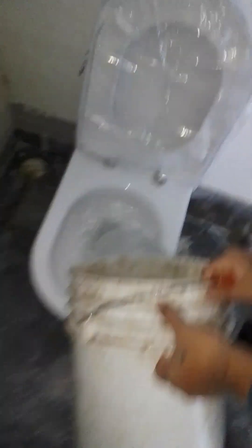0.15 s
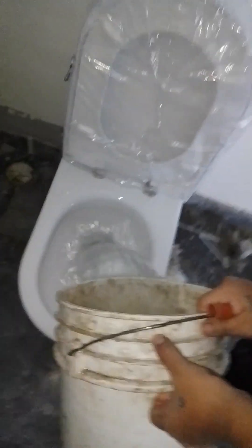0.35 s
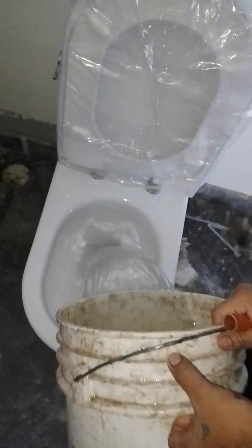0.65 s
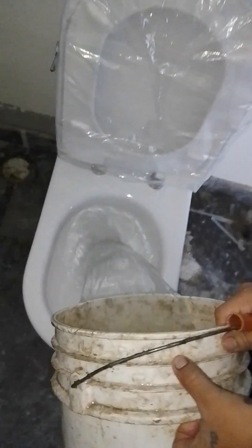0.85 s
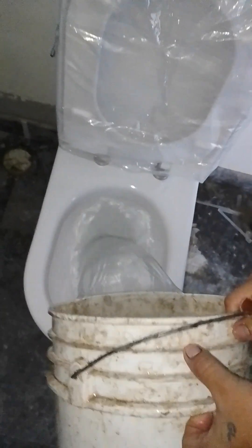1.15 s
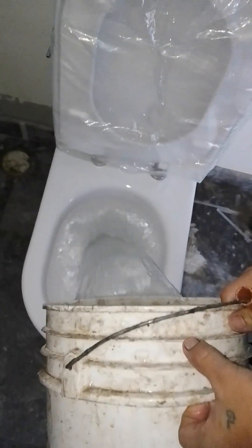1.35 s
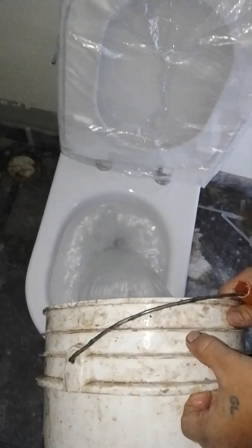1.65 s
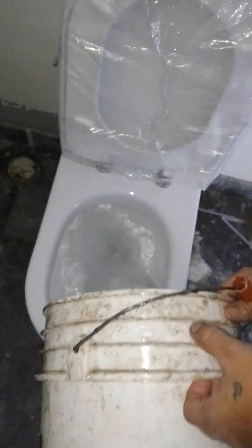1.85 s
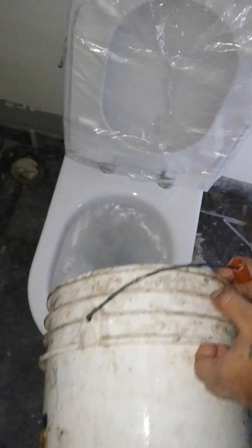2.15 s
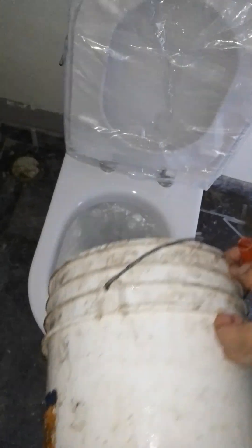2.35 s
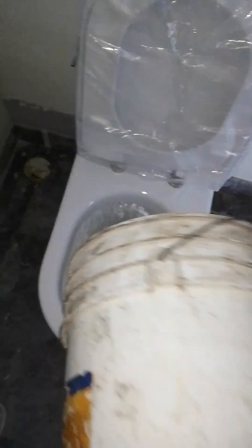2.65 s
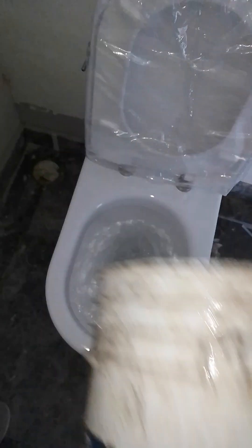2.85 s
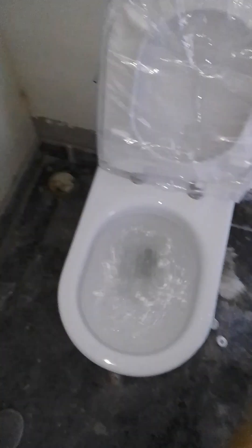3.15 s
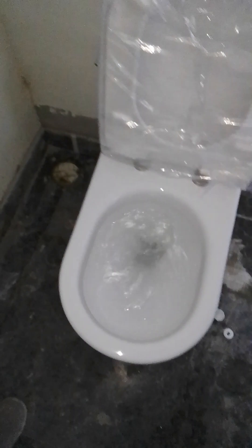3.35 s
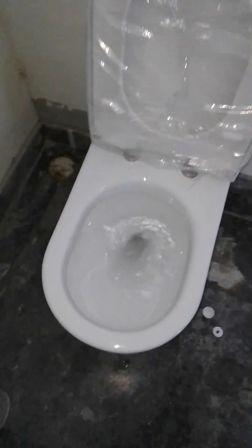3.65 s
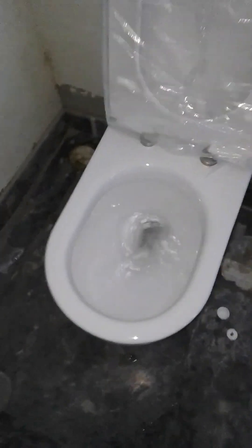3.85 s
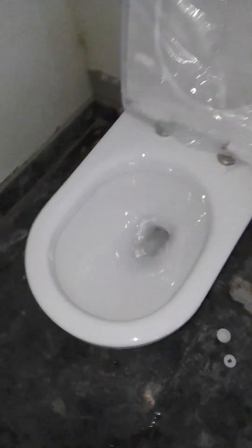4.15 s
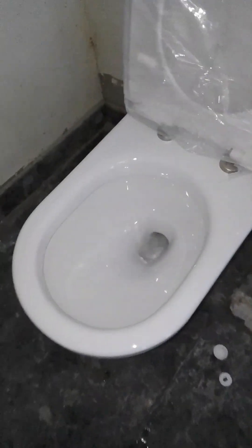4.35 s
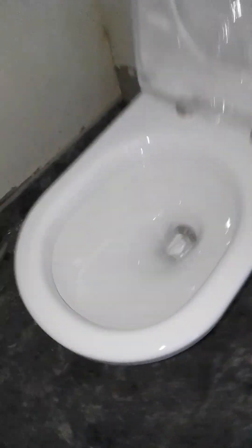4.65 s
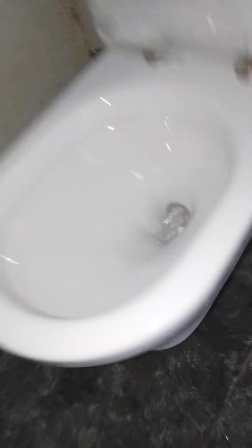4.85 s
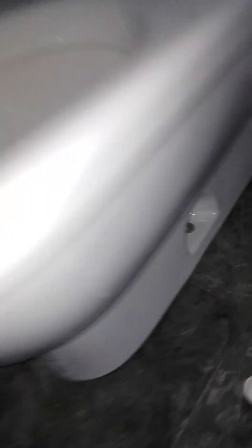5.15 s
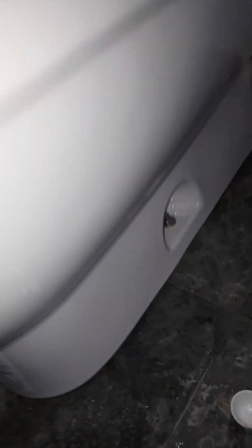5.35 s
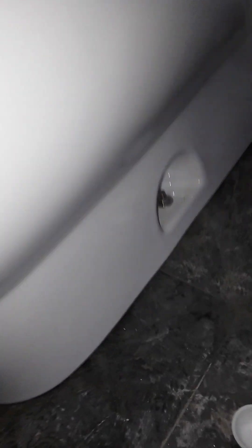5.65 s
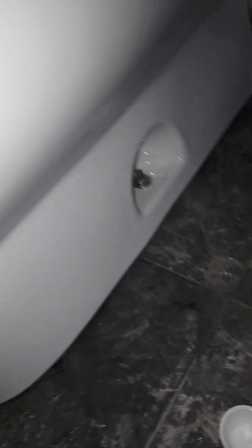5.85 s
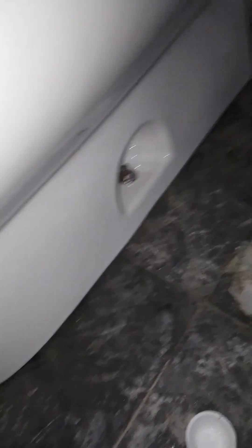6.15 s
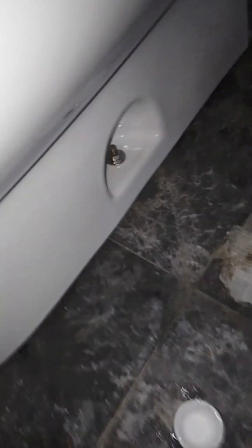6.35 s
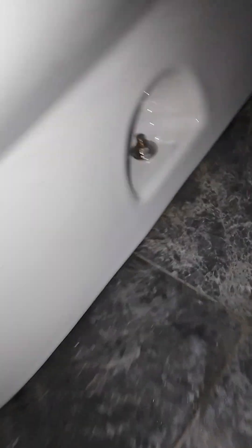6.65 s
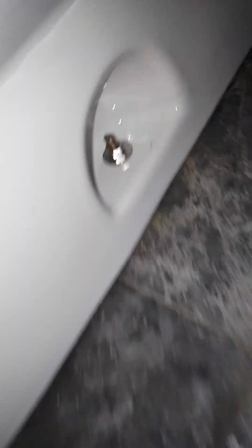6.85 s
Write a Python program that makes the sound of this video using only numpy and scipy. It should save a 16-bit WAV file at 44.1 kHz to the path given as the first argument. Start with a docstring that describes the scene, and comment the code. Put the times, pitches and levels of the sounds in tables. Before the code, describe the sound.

Water pours hard from a bucket into a toilet bowl, thins out, glugs loudly down the trap, then the plastic bucket knocks down and wet shoes shuffle.

```python
"""Bucket emptied into a toilet

A pour into a ceramic bowl in a small tiled room thins out; water swirls and the trap glugs.
Water is noise from tiny impacts plus gliding bubble tones. The plastic bucket bumps and is set down
hard: juddering contacts excite its air and wall modes. Shoes scuff, squelch and creak on the wet
floor while the drain gurgles softly, over a faint hush."""
import sys
import numpy as np
from scipy import signal
from scipy.fft import rfft, irfft
from scipy.io import wavfile
from scipy.ndimage import uniform_filter1d

SR = 44100
rng = np.random.default_rng(int(sys.argv[2]) if len(sys.argv) > 2 else 0)


def materialize(psi):
    """Save the field psi as 16-bit PCM at rate SR to the path in sys.argv[1].

    A 1-D psi becomes a single channel; in a 2-D psi each row is a channel.
    """
    bounded = np.clip(np.atleast_2d(psi).T, -1, 1)
    quanta = np.round(bounded * 32767).astype(np.int16)
    wavfile.write(sys.argv[1], SR, quanta)


N = 308259
TIME = np.arange(N) / SR  # s

# Table levels are relative, ahead of filters, room and layer gains.
# pour spectrum: f/Hz, level/dB
POUR_COLOUR = [(150, -33), (300, -57), (440, -19), (620, -2.5), (800, -2.5), (1200, -2.5), (2600, -4),
               (5500, -5.5), (8600, -7), (10200, -1), (12500, -9.5), (16000, -16.5)]
POUR_RISE_S, THINS_S, BREAKS_S, DIES_DB_PER_S = 0.0003, 0.52, 1.143, 147.5
# pour layers: level/dB, sag/(dB/s); a thinner stream loses its depth first
BODY = (-45, 30.5)
CHURN = (-41, 12.6)
SPRAY = (-42.5, 5.5)

# single splashes, each a cluster of like bubbles: t/s, f/Hz, level/dB
SPLASHES = [(0.088, 458, -34), (0.124, 514, -34), (0.476, 2580, -34), (.555, 1890, -38),
            (0.586, 10300, -36), (0.727, 10200, -37), (0.901, 2280, -35), (1.009, 5500, -35),
            (1.081, 1283, -34), (1.095, 7340, -38), (1.132, 7860, -42.5), (1.596, 622, -42.5),
            (2.865, 2380, -37.5), (3.014, 2550, -39.5)]
DROPS_PER_S, DROP_DB, DROP_LOW_HZ, DROP_HIGH_HZ = 14, -47.5, 2920, 10900  # stray drops of the pour

# swirling water spectrum: f/Hz, level/dB
SWIRL_COLOUR = [(200, -32.5), (400, -18.5), (800, -4), (1500, 0), (3000, -3.5), (4500, -2), (6500, 3),
                (10500, 8), (15500, -1.5)]
# water running round and off the bowl: t/s, churn level/dB, spray level/dB
RUNOFF = [(1.3, -63.5, -68), (1.7, -59.5, -84), (2.0, -44.5, -52.5), (2.25, -49, -56.5), (2.45, -65, -45.5),
          (2.8, -34, -44.5), (2.95, -50.5, -45), (3.22, -48.5, -59), (3.52, -55.5, -56.5), (3.63, -54, -48),
          (3.87, -60.5, -49.5), (4.05, -61, -60.5), (4.5, -55, -55.5), (5.04, -68.5, -60), (5.14, -68, -90)]
# surges of water noise (pour surges, sloshes in the bowl, one bucket rasp at 1.88 s):
# crest t/s, churn level/dB, spray level/dB
SURGES = [(.14, -38, -31), (.57, -40, -41), (.745, -76, -35), (1.635, -74, -56), (1.791, -59, -38),
          (1.881, -31, -40.5), (2.14, -38.5, -44), (2.477, -32.5, -27.5), (2.595, -37.5, -34.5),
          (3.315, -33, -35.5), (5.051, -62, -55.5)]
SURGE_RISE_S, SURGE_FALL_S = 0.04, 0.029

# big air pockets gulped through the trap: t/s, level/dB, f/Hz
GULPS = [(2.389, -14.5, 330), (2.472, -10.5, 348), (2.523, -3.5, 329), (2.604, -23, 323),
         (2.638, -6.5, 340), (2.7, -10, 302), (2.729, -9, 295), (2.814, -10.5, 312), (2.891, -17, 404),
         (3.137, -5.5, 236), (3.141, -23, 106), (3.156, -12.5, 424), (3.191, -24.5, 490), (3.56, -36, 285)]
GULP_CYCLES, GULP_ONSET_CYCLES, GULP_LOW_HZ = 1.82, 1.58, 200
GULP_GLIDE = -0.062  # the pitch sinks as the pocket swells
# water slapping shut over the trap: t/s, slap level/dB, bubble level/dB, bubble f/Hz, ring/cycles
SLAPS = [(2.303, -19, -12, 1100, 2.8), (2.387, -19, -12, 790, 2), (2.393, -44, -17, 920, 7.6),
         (2.409, -19, -25, 907, 13), (2.479, -21, -14.5, 866, 5), (2.525, -45, -16.5, 626, 5.8),
         (2.582, -18.5, -11.5, 850, 8.6), (2.607, -38, -12, 745, 1.7), (2.615, -26, -2.5, 740, 1.8),
         (2.643, -31, -20, 760, 5.6), (2.741, -25, -12, 686, 3.8), (2.756, -34, -20, 914, 2.3),
         (2.778, -47, -13.5, 830, 4.9), (2.815, -38, -16, 735, 3.8), (3.135, -36, -17.5, 399, 4.6),
         (3.215, -41, -35, 890, 28), (3.285, -32, -22.5, 1300, 5)]
# slap spectrum: f/Hz, level/dB
SLAP_COLOUR = [(150, -56.5), (280, 7.5), (520, -6.5), (900, 12.5), (1200, 4.5), (1700, 2.5), (2750, -4.5),
               (3200, -18), (6000, -27), (10500, -14.5), (16000, -27.5)]
SLAP_DECAY_S, SLAP_SPATTER_DB = 0.011, -0.5
PLOP_GLIDE, PLOP_ONSET_CYCLES = 0.024, 0.62
# deep churning spectrum: f/Hz, level/dB
PLUNGE_COLOUR = [(50, -54.5), (100, -23.5), (165, -38.5), (215, -4.5), (280, -3), (330, 7.5), (420, 1.5),
                 (650, 4), (880, -12), (1300, -26), (4000, -51)]
BOIL_START_S, BOIL_FULL_S, BOIL_END_S, BOIL_RELEASE_S = 2.17, 2.44, 2.92, 0.079
BOIL_DB, BOIL_SAG_DB_PER_S = -37, 12
BLIPS_PER_S, BLIP_DB, BLIP_LOW_HZ, BLIP_HIGH_HZ = 70, -10, 328, 1394  # single bubbles in the churn

# bucket contact spectrum: f/Hz, level/dB
BUCKET_COLOUR = [(60, -40.5), (160, -16.5), (210, -8), (420, 1.5), (520, -8.5), (700, -8), (860, 1),
                 (1040, -3.5), (1400, -2), (1800, -6.5), (2250, -5.5), (3000, -17.5), (6000, -28),
                 (10500, -18.5), (16000, -32)]
# bucket knocks: t/s, level/dB, length/s, rasp/dB, hollow ring/dB
KNOCKS = [(1.376, -35.5, 0.03, -12, -12), (1.608, -46.5, .04, 4, -16), (1.864, -25, .03, -7, -3),
          (2.305, -35, 0.037, -1, -2.5), (4.2212, -9, .0065, -2.5, -13), (4.237, -22.5, 0.0097, 0, -6),
          (4.28, -20.5, 0.025, 6.5, -17), (4.375, -20.5, 0.013, 13.5, -12.5), (4.51, -34.5, 0.0026, -5, -9)]
KNOCK_RISE_SHARE, KNOCK_BOOM_DB, BUCKET_RELEASE_S = 0.15, -2, 0.0068  # a shorter knock starts harder
# bucket drags: t/s, level/dB, length/s
SCRAPES = [(1.845, -35, 0.036), (4.032, -34.5, 0.077)]
SCRAPE_RISE_SHARE, SCRAPE_BOOM_DB, SCRAPE_RASP_DB, SCRAPE_HOLLOW_DB = 0.55, -10, -14, -7
# wet base hissing over grit as it rocks: t/s, level/dB, length/s
SKIDS = [(4.243, -37.5, 0.084), (4.267, -30, 0.02), (4.387, -26, 0.011), (4.425, -28.5, 0.016)]
# skid spectrum: f/Hz, level/dB
SKID_COLOUR = [(1500, -31), (3500, -4.5), (7000, -12.5), (10500, 3.5), (13500, -3.5), (16000, -9)]
SKID_RISE_SHARE = 0.32
# air column in the bucket: f/Hz, level/dB, t60/s
AIR_MODES = [(434.4, 10, 0.11), (947, 12, 0.048), (1310, 13.5, 0.066), (1655, 6, .06), (2100, 4, .04),
             (2720, 7, .05)]
# bucket wall: f/Hz, level/dB, t60/s
BUCKET_MODES = [(210, -27.5, .8), (308, -24, 1.05), (385, -24, 1.1), (441, -19.5, .9), (791, -23, .85),
                (862, -20, .8), (912, -19, .75), (1158, -23, .6), (1297, -23, .55), (1401, -22, .65),
                (1464, -21.5, .65), (1680, -21, .5), (2083, -26, .28), (2270, -24, .33)]
TWIN_SPLIT, TWIN_GAIN = 0.016, 0.5  # not quite round: each mode beats with a detuned twin
WALL_RING_DB, HAND_DAMPING_DB, LANDS_S = 0.5, -7.5, 4.2  # in the hand, the wall rings weaker

# footstep spectrum: f/Hz, level/dB
STEP_COLOUR = [(60, -27), (110, -4), (165, -5.5), (300, 2.5), (480, 5), (750, -4), (1100, -9.5),
               (1500, -9.5), (2450, -11), (3000, -8), (4200, -3.5), (6500, -9), (10500, -0.5),
               (16000, -13.5)]
# footfalls: t/s, slap level/dB, length/s, grit level/dB
FOOTFALLS = [(5.355, -48, 0.0014, -48), (5.775, -37, 0.004, -51), (5.799, -38.5, 0.023, -42.5),
             (5.995, -37.5, 0.0057, -43), (6.068, -28, 0.006, -36.5), (6.133, -30, 0.0078, -48),
             (6.236, -41, 0.0023, -47), (6.26, -19.5, 0.0037, -33), (6.363, -47, 0.0012, -41),
             (6.662, -46, 0.0062, -74)]
FOOT_RISE_S, FOOT_THUD_DB = 0.00068, -30  # all carry the same weight
# soles sliding: t/s, level/dB, length/s, thud/dB, grit level/dB
SCUFFS = [(5.296, -54.5, 0.17, 11.5, -45), (5.462, -64, 0.11, 12.5, -44), (5.902, -42, 0.2, -19, -45),
          (6.086, -41.5, 0.058, 4, -52), (6.263, -51, 0.052, 14.5, -56), (6.367, -58, 0.079, -1, -44)]
SCUFF_RISE_SHARE = 0.42
# water squeezed from under a sole: t/s, f/Hz, level/dB
SQUELCHES = [(5.8, 457, -39), (6.015, 976, -45.5), (6.06, 334, -33), (6.065, 1930, -33), (6.125, 543, -45),
             (6.263, 1880, -33), (6.285, 936, -44)]
# hollow ring under a footfall: f/Hz, level/dB, t60/s
STEP_MODES = [(394, -7.5, 0.067), (915, 3, .1), (1874, 7, .07), (2170, 1, 0.041)]

# sharp ticks of drips and wet soles: t/s, level/dB
TICKS = [(1.476, -36.5), (4.082, -29.5), (4.585, -30.5), (4.73, -36), (4.905, -38), (4.976, -34),
         (5.176, -42.5), (6.584, -36.5), (6.931, -30.5)]
# creaking sole: t/s, length/s, level/dB ahead of the swell
CREAKS = [(6.493, 0.033, -38.5), (6.584, 0.024, -37.5), (6.707, 0.049, -34)]
CREAK_SWELL_DB = 8  # rise from start to end
# tick and creak spectrum: f/Hz, level/dB
TICK_COLOUR = [(1200, -22.0), (2500, -11.5), (3600, -3.5), (4200, -0.5), (6000, -5.0),
               (8500, 0.5), (11000, 7.0), (14000, -3.0), (16000, -2.5)]

# sleeve or trouser leg swishing: t/s, level/dB, centre f/Hz
SWISH = [(5.2, -71, 906), (5.3, -55, 1240), (5.38, -55.5, 2050), (5.52, -53, 3100), (5.62, -74, 3200)]
SWISH_WIDTH_HZ = 1800

# last water deep in the drain pipe
DRAIN_START_S, DRAIN_DB, DRAIN_HZ, DRAIN_SCATTER, DRAIN_PER_S = 5.35, -55, 283, 0.139, 16

# reverberation time: f/Hz, t60/s
ROOM_T60 = [(100, 1.4), (300, 1.08), (600, 0.81), (1200, 0.6), (2500, 0.36), (6000, 0.31), (14000, 0.16)]
# standing waves: f/Hz, level/dB, t60/s
ROOM_MODES = [(214.5, 1.5, 1.4), (283.5, -3, 0.92), (296.3, 2.5, 2.3), (332.6, -4.5, 3), (414, -6, 1.6),
              (451, -7.5, 0.22)]
# hush spectrum: f/Hz, level/dB
HUSH = [(25, -11.5), (100, -4.5), (160, -4.5), (290, 0.5), (520, -11.5), (1500, -17.5), (6000, -27),
        (10700, -14.5), (16000, -23)]
HUSH_DB = -60.5
EDGE_HZ = 16200


def pour():
    """The thick stream hits the bowl; water also surges and swirls: impact noise mixed with bubbles."""
    foam = froth(cycles=12, spread_db=3)
    stream = patter(rate_per_s=1000, spread_db=0.5, decay_s=0.0015) + amp(-4.0) * foam
    trickle = patter(rate_per_s=990, spread_db=4.5, decay_s=0.0015) + amp(-2.5) * foam
    churning = flow(*CHURN) * wavering(depth_db=1.5, rate_hz=26.7)
    spraying = flow(*SPRAY) * wavering(depth_db=4.0, rate_hz=35)
    return water(churning, spraying, POUR_COLOUR, stream) + water(*swirl(), SWIRL_COLOUR, trickle)


def flow(db, sag_db_per_s):
    """Gain of one layer of the pour: it starts, holds, thins and breaks off."""
    thinning_db = sag_db_per_s * np.maximum(TIME - THINS_S, 0)
    breaking_db = DIES_DB_PER_S * np.maximum(TIME - BREAKS_S, 0)
    return amp(db - thinning_db - breaking_db) * (1 - np.exp(-TIME / POUR_RISE_S))


def wavering(depth_db, rate_hz):
    """Gain wandering through random knots at the given rate."""
    knots = rng.standard_normal(1000)
    return amp(depth_db * np.interp(TIME * rate_hz, np.arange(len(knots)), knots))


def swirl(churn_db=-2, spray_db=-4):
    """Churn and spray gains: the run-off, with each surge swelling and falling on top."""
    churning, spraying = levels(RUNOFF)
    for s, low_db, high_db in SURGES:
        swell = np.exp(-np.maximum((s - TIME) / SURGE_RISE_S, (TIME - s) / SURGE_FALL_S))
        churning = np.hypot(churning, amp(low_db) * swell)
        spraying = np.hypot(spraying, amp(high_db) * swell)
    return amp(churn_db) * churning, amp(spray_db) * spraying


def water(churning, spraying, colour, drive, split_hz=3500):
    """Bubbles and drops sound in the bowl: low churn and high spray each follow their gain."""
    sound = tint(drive, colour)[:N]
    churn, spray = (unit(signal.sosfilt(signal.butter(3, split_hz, side, fs=SR, output="sos"), sound))
                    for side in ("low", "high"))
    return churning * churn + spraying * spray


def splashes():
    """Blobs of water smack down as bubble clusters; stray drops thicken until the stream breaks up."""
    out = np.zeros(N)
    drops = []
    for when, size in rng.random((round(DROPS_PER_S * BREAKS_S), 2)):
        hz = DROP_LOW_HZ * (DROP_HIGH_HZ / DROP_LOW_HZ) ** size
        drops.append((np.sqrt(when) * BREAKS_S, hz, DROP_DB))
    for s, hz, db in SPLASHES + drops:
        add(out, s, amp(db) * cluster(hz, scatter=0.255, linger_s=0.0088, cycles=3.5, count=24))
    return out


def glugs():
    """Air breaks through the boiling trap: big pockets boom, water slaps shut, smaller bubbles plop."""
    gulps = np.zeros(N)
    for s, db, hz in GULPS:
        add(gulps, s, amp(db) * bubble(hz, GULP_CYCLES, GULP_GLIDE, GULP_ONSET_CYCLES))
    out = plunge() + signal.lfilter(*signal.butter(2, GULP_LOW_HZ, "high", fs=SR), gulps)
    for s, slap_db, bubble_db, hz, cycles in SLAPS:
        add(out, s, amp(slap_db) * slap())
        add(out, s, amp(bubble_db) * bubble(hz, cycles, PLOP_GLIDE, PLOP_ONSET_CYCLES))
    return out


def plunge():
    """Deep churning in the trap: first under the stream, then boiling as the bowl drains."""
    swell = np.clip((TIME - BOIL_START_S) / (BOIL_FULL_S - BOIL_START_S), 0, 1) ** 0.97
    hold = amp(BOIL_DB - BOIL_SAG_DB_PER_S * np.maximum(TIME - BOIL_FULL_S, 0))
    release = np.exp(-np.maximum(TIME - BOIL_END_S, 0) / BOIL_RELEASE_S)
    boil = swell * hold * release
    churn = tint(patter(rate_per_s=59, spread_db=-2.5, decay_s=0.0066), PLUNGE_COLOUR)[:N]
    return (flow(*BODY) + boil) * (churn + amp(BLIP_DB) * blips())


def blips():
    """Separate bubbles of uneven size, each a short rising tone."""
    out = np.zeros(N)
    for when, size, loud in rng.random((round(BLIPS_PER_S * N / SR), 3)):
        hz = BLIP_LOW_HZ * (BLIP_HIGH_HZ / BLIP_LOW_HZ) ** size
        add(out, when * N / SR, amp(-14 * loud) * bubble(hz, cycles=6.5, glide=0.078))
    return unit(out)


def slap():
    """A sheet of water claps shut: one impulse crack on decaying spatter noise."""
    spatter = amp(SLAP_SPATTER_DB) * burst(decay_s=SLAP_DECAY_S)
    add(spatter, 0, np.array([amp(16)]))
    return tint(spatter, SLAP_COLOUR)


def bucket():
    """The hollow plastic bucket bumps, lands, rocks and skids; knocks and drags sound the air inside."""
    rows = [(s, db, KNOCK_RISE_SHARE * length, length, KNOCK_BOOM_DB, rasp_db, hollow_db)
            for s, db, length, rasp_db, hollow_db in KNOCKS]
    rows += [(s, db, SCRAPE_RISE_SHARE * length, length, SCRAPE_BOOM_DB, SCRAPE_RASP_DB, SCRAPE_HOLLOW_DB)
             for s, db, length in SCRAPES]
    wall_rows = [row[:-1] for row in rows]
    air_rows = [(s, db + hollow_db, *rest) for s, db, *rest, hollow_db in rows]
    skid_rows = [(s, db, SKID_RISE_SHARE * length, length, 0, 0) for s, db, length in SKIDS]
    grain = patter(rate_per_s=2300, spread_db=3.5, decay_s=0.0021)
    wall = contacts(wall_rows, BUCKET_COLOUR, grain, BUCKET_RELEASE_S)
    air = contacts(air_rows, BUCKET_COLOUR, grain, BUCKET_RELEASE_S)
    return wall + ring(air, AIR_MODES) + contacts(skid_rows, SKID_COLOUR, grain, BUCKET_RELEASE_S)


def ringing():
    """The bucket's wall rings after each knock, more strongly once it stands on the floor."""
    blows = [(s, db + HAND_DAMPING_DB * (s < LANDS_S)) for s, db, *_ in KNOCKS]
    return amp(WALL_RING_DB) * struck(blows, BUCKET_MODES)


def struck(blows, modes):
    """Each blow (t/s, level/dB) rings the same mode pairs; neighbours start in opposite phase."""
    t, out, note = TIME[:SR], np.zeros(N), np.zeros(SR)
    for k, (hz, db, t60) in enumerate(modes):
        twin_hz = hz * (1 + rng.choice([-1, 1]) * TWIN_SPLIT * rng.uniform(0.54, 1))
        pair = np.sin(2 * np.pi * hz * t) + TWIN_GAIN * np.cos(2 * np.pi * twin_hz * t)
        note += (-1) ** k * amp(db - 60 * t / t60) * pair
    note = signal.lfilter(*signal.butter(2, modes[0][0] / 2, "high", fs=SR), note)
    for s, db in blows:
        add(out, s, amp(db) * note)
    return out


def contacts(rows, colour, grain, release_s):
    """Each contact is a short judder of tiny impacts, with its own bass and treble shelves."""
    out = np.zeros(N)
    for s, db, rise_s, length_s, low_db, high_db in rows:
        t = TIME[:int((length_s + 6 * release_s) * SR)]
        shape = np.minimum(t / rise_s, 1) ** 2 * np.exp(-np.maximum(t - length_s, 0) / release_s)
        judder = unit(shape * grain[round(s * SR):][:len(t)]) * np.sqrt(np.mean(shape ** 2))
        add(out, s, amp(db) * tint(smoothed(judder, 80, 1500), colour, low_db, high_db))
    return out


def feet():
    """Shoes land, scuff and squelch on wet, gritty tile: contacts, hollow modes and bubble clusters."""
    # thud and grit levels become shelves relative to the contact
    rows = [(s, db, FOOT_RISE_S, length, FOOT_THUD_DB - db, grit_db - db)
            for s, db, length, grit_db in FOOTFALLS]
    rows += [(s, db, SCUFF_RISE_SHARE * length, length, thud_db, grit_db - db)
             for s, db, length, thud_db, grit_db in SCUFFS]
    grain = patter(rate_per_s=410, spread_db=-6, decay_s=0.0028)
    out = contacts(rows, STEP_COLOUR, grain, release_s=0.013)
    out = out + ring(out, STEP_MODES)
    for s, hz, db in SQUELCHES:
        add(out, s, amp(db) * cluster(hz, scatter=0.1, linger_s=0.0079, cycles=3.6, count=24))
    return out


def ticks(slips_per_s=150):
    """Tiny noise ticks, and a creaking sole: a train of stick-slip pulses that swells, then stops."""
    out = np.zeros(N)
    for s, db in TICKS:
        add(out, s, amp(db) * burst(decay_s=0.00062))
    slips = np.diff(np.floor(slips_per_s * TIME), prepend=0)
    slip_shape = signal.oaconvolve(slips, np.exp(-TIME[:400] / 0.0008))[:N]
    rasp = unit(slip_shape * rng.standard_normal(N))
    for s, length, db in CREAKS:
        t = TIME[:int(length * SR)]
        add(out, s, amp(db + CREAK_SWELL_DB * (t / length - 2.0)) * rasp[round(s * SR):][:len(t)])
    return tint(out, TICK_COLOUR)[:N]


def swish():
    """Cloth rubs: fine grain in one broad band that slides upward."""
    s, db, hz = np.transpose(SWISH)
    turn = np.exp(2j * np.pi * np.cumsum(np.interp(TIME, s, hz)) / SR)
    grain = patter(rate_per_s=490, spread_db=3.0, decay_s=0.0025)
    # shift to zero, low-pass, shift back: a moving band-pass
    band = signal.lfilter(*signal.butter(2, SWISH_WIDTH_HZ / 2, fs=SR), grain / turn)
    return levels(np.c_[s, db])[0] * unit((turn * band).real)


def drain():
    """Soft, long-ringing bubbles overlap in the pipe and merge into a wavering low tone."""
    out = np.zeros(N)
    for k, (late, size) in enumerate(rng.random((round(DRAIN_PER_S * N / SR), 2))):
        hz = DRAIN_HZ * np.exp(DRAIN_SCATTER * (2 * size - 1))
        add(out, (k + late) / DRAIN_PER_S, bubble(hz, cycles=20.6, glide=-0.018, soft_cycles=5.5))
    return amp(DRAIN_DB) * unit(out) * np.clip((TIME - DRAIN_START_S) * 10, 0, 1)


def room(x, wet_db, gap_s=0.0017, size=256):
    """Hard tiled walls: dense reflections, each band dying at its own rate, and low standing waves."""
    taps = rng.choice([-1., 1.], SR) * (rng.random(SR) < 4000 / SR) * (TIME[:SR] > gap_s)
    hz, t, z = signal.stft(taps, SR, nperseg=size)
    fade = amp(-60 * t / read(ROOM_T60, hz)[:, None])
    fade = fade * (1 + np.exp(-t / 0.037))  # the nearest walls answer strongest
    tail = smoothed(signal.istft(z * fade, SR, nperseg=size)[1])
    tail /= np.sqrt(np.mean(abs(rfft(tail)[200:3000]) ** 2))
    return x + amp(wet_db) * (signal.oaconvolve(x, tail)[:N] + 2 * ring(x, ROOM_MODES))


def bubble(hz, cycles, glide, soft_cycles=0.92):
    """An air pocket rings with a decay of some cycles, gliding in pitch as it moves."""
    age = np.arange(int(5 * cycles / hz * SR) + 2) * hz / SR  # cycles
    tone = np.sin(2 * np.pi * age * (1 + glide * age / cycles / 2))
    return tone * np.exp(-age / cycles) * (1 - np.exp(-age / soft_cycles))


def cluster(hz, scatter, linger_s, cycles, count):
    """A blob of water traps bubbles of like size within some milliseconds; rms 1 over 10 ms."""
    out = np.zeros(SR // 2)
    for k, (wait, size) in enumerate(rng.random((count, 2))):
        late_s = -linger_s * np.log(wait) * (k > 0)
        bubble_hz = hz * np.exp(scatter * (2 * size - 1))
        add(out, late_s, bubble(bubble_hz, cycles, 0.032) / np.sqrt(k + 1))
    return unit(out) / np.sqrt(50)  # from 0.5 s to 10 ms


def froth(cycles, spread_db, count=10000):
    """A cloud of bubbles of all sizes, with even power per Hz."""
    out = np.zeros(N)
    for when, size, loud in rng.random((count, 3)):
        hz = 250 + 14500 * size ** 2
        gain = hz ** (3 / 4) * amp(-spread_db * np.log(loud + 0.27))
        add(out, when * N / SR, gain * bubble(hz, cycles, 0.011))
    return unit(out)


def patter(rate_per_s, spread_db, decay_s):
    """Noise whose power follows many small decaying impacts of uneven size."""
    sizes = amp(spread_db * np.minimum(rng.exponential(1, N), 4))
    power = (rng.random(N) < rate_per_s / SR) * sizes ** 2
    envelope = np.sqrt(signal.lfilter([1], [1, -np.exp(-1 / (decay_s * SR))], power))
    return unit(envelope * rng.standard_normal(N))


def burst(decay_s, count=4000):
    """A puff of noise that starts at once and dies away."""
    shape = np.exp(-TIME[:count] / decay_s)
    puff = shape * rng.standard_normal(count)
    return unit(puff) * np.sqrt(np.mean(shape ** 2))


def ring(x, modes):
    """Rings damped modes; each has a peak gain of its dB."""
    t = TIME[:SR]
    response = sum(amp(db - 60 * t / t60) * np.cos(2 * np.pi * hz * t) * 2 * np.log(1000) / (t60 * SR)
                   for hz, db, t60 in modes)
    return signal.oaconvolve(x, response)[:N]


def tint(x, colour, low_db=0, high_db=0, low_hz=560, high_hz=3200, size=2048):
    """Causal filter with a given spectrum and end shelves; without shelves white noise keeps its power."""
    hz = np.fft.rfftfreq(size, 1 / SR)
    low_shelf_db = low_db / (1 + (hz / low_hz) ** 6)
    high_shelf_db = high_db * (1 - 1 / (1 + (hz / high_hz) ** 6))
    log_gain = np.log(unit(amp(read(colour, hz))) * amp(low_shelf_db + high_shelf_db) + 1e-6)
    # minimum phase from the Hilbert transform of the log gain
    analytic = signal.hilbert(np.r_[log_gain, log_gain[-2:0:-1]])[:len(hz)]
    kernel = irfft(np.exp(np.conj(analytic)), size)
    return signal.oaconvolve(x, kernel)[:len(x) + size]


def smoothed(x, fine_hz=20, broad_hz=240):
    """Evens out chance peaks and holes in a noisy decay's spectrum, keeping its broad colour."""
    power = abs(rfft(x, SR)) ** 2  # 1 Hz bins
    fine, broad = (abs(uniform_filter1d(power, width)) + 1e-9 for width in (fine_hz, broad_hz))
    return tint(x, np.c_[np.arange(len(power)), 10 * np.log10(broad / fine)], size=4096)


def levels(rows):
    """Gain curves from rows of (t/s, level/dB, ..), silent outside their span."""
    s, *columns = np.transpose(rows)
    gate = np.interp(TIME, [s[0] - .02, s[0], s[-1], s[-1] + .02], [0, 1, 1, 0])
    return [amp(np.interp(TIME, s, column)) * gate for column in columns]


def read(points, hz):
    """Reads a table on a log-frequency axis."""
    f, value = np.transpose(points)
    return np.interp(np.log(hz + 1), np.log(f + 1), value)


def add(mix, s, sound):
    """Mixes a sound in at time s."""
    part = mix[max(round(s * SR), 0):][:len(sound)]
    part += sound[:len(part)]


def amp(db):
    """Decibels to gain."""
    return 10 ** (np.asarray(db) / 20)


def unit(x):
    """Scales to rms 1."""
    return x / np.sqrt(np.mean(x ** 2) + 1e-20)


def scene():
    """Bowl, bucket and feet in the room, with the drain and a faint hush of filtered noise."""
    bowl = room(pour() + splashes(), wet_db=-2.5) + room(glugs(), wet_db=-2.5)
    handling = room(bucket(), wet_db=1.5) + ringing()
    steps = room(feet() + swish(), wet_db=-1.0) + room(ticks(), wet_db=0.5)
    hush = amp(HUSH_DB) * tint(rng.standard_normal(N), HUSH)[:N]
    return (bowl + handling + steps + drain() + hush)[None]


def record(dry, dip_hz=160, dip_q=2.7, low_cut_hz=35):
    """A bass roll-off, a dip in the upper bass, then a steep treble limit."""
    rolled_off = signal.lfilter(*signal.butter(1, low_cut_hz, "high", fs=SR), dry)
    thinned = signal.lfilter(*signal.iirnotch(dip_hz, dip_q, SR), rolled_off)
    band_limit = signal.firwin(511, EDGE_HZ, window=("kaiser", 9), fs=SR)
    return signal.oaconvolve(thinned, band_limit[None], "same")


dry = scene()
out = record(dry)
materialize(out)
```